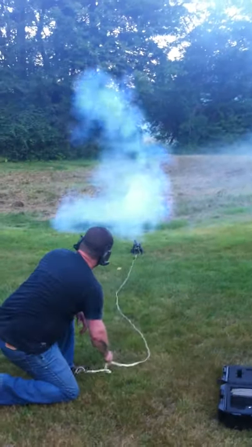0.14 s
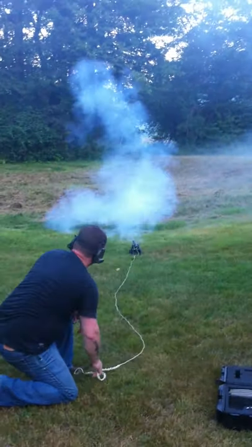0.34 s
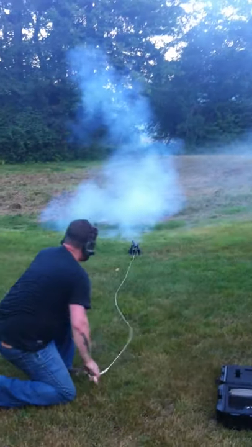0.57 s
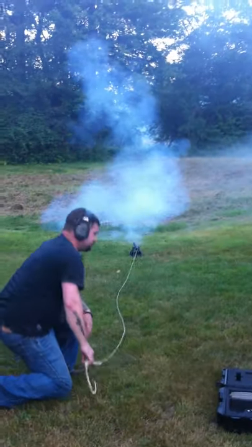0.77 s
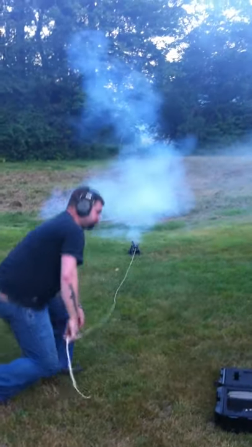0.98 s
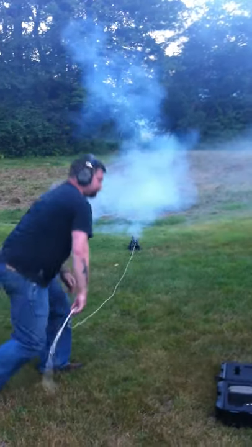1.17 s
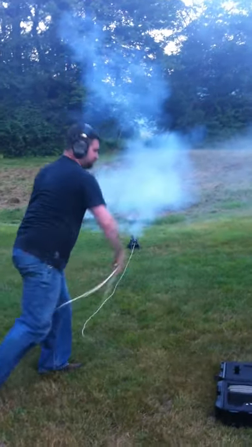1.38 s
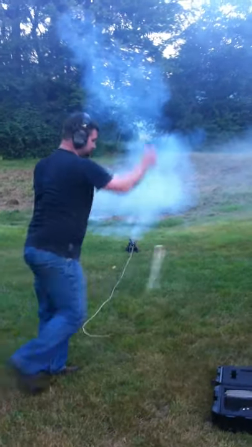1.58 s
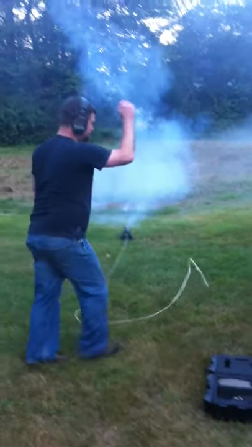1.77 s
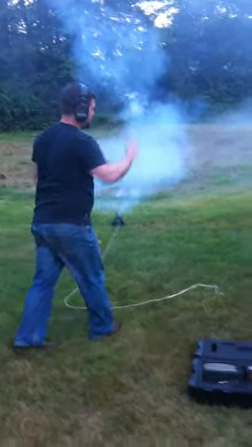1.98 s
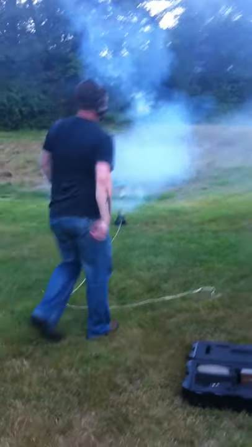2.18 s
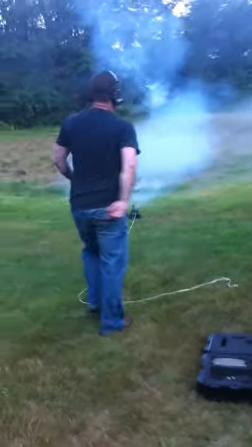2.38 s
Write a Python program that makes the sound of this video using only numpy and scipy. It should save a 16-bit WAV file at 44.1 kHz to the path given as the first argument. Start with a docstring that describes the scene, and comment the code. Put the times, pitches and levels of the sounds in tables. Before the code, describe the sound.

A small cannon's echo rolls back from distant woods and steadily fades outdoors.

```python
"""The echo of a small black powder cannon rolls over an open field; the shot itself is not heard.
The near tree line scatters the blast back bright, the far woods return a long rumble, and
absorption in air and foliage takes the treble first. A few reflections stand out as thumps and slaps.
A faint hiss comes up under the tail, with a low rumble and soft steps in the grass."""
import sys
import numpy as np
from scipy import signal
from scipy.fft import rfft, irfft, next_fast_len
from scipy.io import wavfile
from scipy.ndimage import uniform_filter1d, map_coordinates

SR = 44100
rng = np.random.default_rng(int(sys.argv[2]) if len(sys.argv) > 2 else 0)


def generate_wav(signal):
    """Clip the signal to [-1, 1] and save it as 16-bit WAV at the path in sys.argv[1]."""
    frames = np.transpose(np.atleast_2d(signal))
    scaled = np.clip(frames, -1, 1) * 32767
    pcm = np.round(scaled).astype(np.int16)
    wavfile.write(sys.argv[1], SR, pcm)


N = 107295


# Spectrum of the near echo before absorption: frequency_hz, level_db
NEAR_SPECTRUM = [(30, -11), (64, -18), (95, -7), (120, 3), (175, -1), (280, -1.5), (420, 0), (590, -4.5),
                 (760, -2), (1050, -4), (1400, -3), (2200, -3.5), (3600, -8.5), (5200, -10), (8000, -16),
                 (12000, -18), (14400, -21), (15800, -55)]
def near_trees(level_db=-32, hold_s=0.21, fade_db_per_s=24):
    """Backscatter over a short path: the tree line answers at once, holds briefly and dies away."""
    fading_s = np.maximum(np.arange(N) / SR - hold_s, 0)
    return amp(level_db - fade_db_per_s * fading_s) * scatter(NEAR_SPECTRUM)


# Spectrum of the far echo before absorption: frequency_hz, level_db
FAR_SPECTRUM = [(25, -18), (50, -19), (80, -11), (115, -14), (150, 2.5), (200, 1), (290, 1.5), (430, 2.5),
                (590, -0.5), (740, 3), (880, 3), (1030, -2.5), (1400, -2.5), (2300, -2), (3600, -8),
                (5200, -12.5), (8000, -20.5), (12000, -16.5), (16000, -42)]
# Envelope of the far echo before absorption: time_s, level_db
FAR_ENVELOPE = [(0, -36), (.25, -40.5), (.42, -37.5), (.52, -34), (.7, -33.5), (1.03, -35), (1.2, -36),
                (1.48, -37.5), (1.7, -38.5), (1.92, -40.5), (2.25, -39), (2.43, -41)]
def far_woods():
    """Reverberation: paths of many lengths spread the echo of the distant woods into a long roll."""
    return amp(curve(FAR_ENVELOPE)) * scatter(FAR_SPECTRUM)


# Absorption in air and foliage: frequency_hz, loss_db_per_s
ABSORPTION = [(60, 5), (150, 0), (400, 2), (800, 5.5), (1400, 8.5), (2500, 15.5), (4500, 26), (7500, 31.5),
              (12000, 56), (16000, 80)]
def scatter(spectrum, patch_db=0.9, flutter_db=0.2, flutter_per_s=45):
    """Diffuse scattering: countless reflections sum to noise, and later ones have lost more treble."""
    hz, travel_s, spectrogram = signal.stft(noise(spectrum), SR, nperseg=512)
    # The level varies in small random patches of frequency and time.
    patches = uniform_filter1d(rng.standard_normal(spectrogram.shape), size=5, axis=0)
    patches = unit(uniform_filter1d(patches, size=8, axis=1))
    loss_db = along(ABSORPTION, hz)[:, None] * travel_s
    echoes = signal.istft(spectrogram * amp(patch_db * patches - loss_db), nperseg=512)[1][:N]
    return echoes * amp(flutter_db * wobble(flutter_per_s))


# Single reflections of the blast: centre_s, peak_db, pitch_hz
THUMPS = [(0.035, -26.5, 128), (0.047, -49, 390), (.1, -30, 800), (0.126, -32, 123), (0.147, -28, 324),
          (0.168, -31, 134), (0.21, -36.5, 114), (.23, -29.5, 425), (0.266, -29.5, 143), (0.547, -36, 292)]
def thumps(width_cycles=0.69):
    """Coherent reflection: the pressure wave returns whole, a couple of cycles in a Gaussian envelope."""
    out = np.zeros(N)
    phases = rng.uniform(0, 2 * np.pi, len(THUMPS))
    for (centre_s, peak_db, pitch_hz), phase in zip(THUMPS, phases):
        cycles = (np.arange(N) / SR - centre_s) * pitch_hz
        envelope = np.exp(-.5 * (cycles / width_cycles) ** 2)
        out += amp(peak_db) * envelope * np.cos(2 * np.pi * cycles + phase)
    return out


# Prominent clusters of reflections: start_s, level_db, centre_hz, width_octaves, decay_s
SLAPS = [(0, -35, 4500, 0.93, 0.017), (.029, -31, 1100, 1.2, 0.013), (.07, -29, 1440, 0.12, 0.011),
         (.09, -30, 830, 0.26, 0.028), (.48, -45.5, 1800, 0.97, 0.028), (.526, -33, 356, 0.44, .04),
         (.565, -48, 174, 0.21, 0.043), (.62, -33.5, 736, 0.22, 0.011), (1.045, -32.5, 258, 1.1, 0.015),
         (1.38, -51, 780, 0.14, 0.25), (1.7, -51, 770, 0.19, 0.12)]
def slaps():
    """Incoherent summation: closely spaced reflections merge into bursts of noise."""
    return bursts(SLAPS, rise_s=0.0054)


# Contacts with the grass: start_s, level_db, centre_hz, width_octaves, decay_s
BRUSHES = [(2.046, -57, 3630, 0.049, 0.0046), (2.05, -76, 5900, 1, .015), (2.05, -76, 5400, .12, 0.27),
           (2.167, -63.5, 3250, .15, .014), (2.167, -65, 9000, 0.48, .014), (2.245, -68, 4000, 0.71, .012)]
def grass_steps():
    """Friction: steps and a cord brush the grass in faint, high bursts."""
    return bursts(BRUSHES, rise_s=0.0011)


# Spectra of the hiss, its airy top and the distant rumble: frequency_hz, level_db
HISS_SPECTRUM = [(100, -11), (170, 13), (400, -13), (1000, 11.5), (2500, 5.5), (4200, 1.5), (5400, 3),
                 (7500, -3), (10000, -4.5), (13500, -11.5), (17000, -6)]
FIZZ_SPECTRUM = [(3000, -32), (7500, -6), (10000, -3), (13500, 0.5), (17000, -3)]
RUMBLE_SPECTRUM = [(25, -30), (60, -29.5), (110, -7.5), (155, 0.5), (220, -8.5), (400, -13), (1000, -42),
                   (4000, -80)]
# Envelopes of the hiss and its airy top: time_s, level_db
HISS_ENVELOPE = [(0, -79), (.7, -73), (1.1, -67), (1.7, -67.5), (1.9, -65.5), (2.22, -65), (2.43, -64)]
FIZZ_ENVELOPE = [(0, -92), (.7, -75.5), (1.1, -73), (1.35, -75.5), (1.75, -71.5), (1.85, -67), (1.98, -68),
                 (2.22, -73.5), (2.35, -68), (2.43, -70)]
def background_noise(hiss_waver_db=0.4, fizz_waver_db=1.2, rumble_db=-54):
    """Background: a faint, wavering hiss swells as the echo fades, over a steady low rumble."""
    hiss = amp(curve(HISS_ENVELOPE) + hiss_waver_db * wobble(14.55)) * noise(HISS_SPECTRUM)
    fizz = amp(curve(FIZZ_ENVELOPE) + fizz_waver_db * wobble(14)) * noise(FIZZ_SPECTRUM)
    return hiss + fizz + amp(rumble_db) * noise(RUMBLE_SPECTRUM)


def bursts(rows, rise_s):
    """Exponential decay: each row is a band of noise that rises quickly and dies away."""
    out = np.zeros(N)
    for start_s, level_db, centre_hz, width_octaves, decay_s in rows:
        age_s = np.maximum(np.arange(N) / SR - start_s, 0)
        envelope = (1 - np.exp(-age_s / rise_s)) * np.exp(-age_s / decay_s)
        white = rng.standard_normal(N)
        band = filtered(white, lambda hz: np.exp(-.5 * (np.log2((hz + 1) / centre_hz) / width_octaves) ** 2))
        envelope_rms = np.sqrt(np.mean(envelope ** 2))
        out += amp(level_db) * envelope_rms * unit(band * envelope)
    return out


def noise(spectrum):
    """Spectral shaping: white noise coloured by a spectrum, at rms 1."""
    return unit(filtered(rng.standard_normal(N), lambda hz: amp(along(spectrum, hz))))


def filtered(x, response):
    """Linear filtering: the spectrum of x times a frequency response."""
    size = next_fast_len(N + SR // 2)
    hz = np.fft.rfftfreq(size, 1 / SR)
    return irfft(rfft(x, size) * response(hz), size)[:N]


def wobble(knots_per_s):
    """Random modulation: a smooth curve through Gaussian knots."""
    knots = rng.standard_normal(int(N * knots_per_s / SR) + 4)
    return map_coordinates(knots, [np.arange(N) * knots_per_s / SR])


def curve(rows):
    """Linear interpolation of (time_s, value) rows at every sample."""
    return np.interp(np.arange(N) / SR, *np.transpose(rows))


def along(rows, hz):
    """Interpolation of (frequency_hz, value) rows on a logarithmic frequency axis."""
    row_hz, values = np.transpose(rows)
    return np.interp(np.log(hz + 1), np.log(row_hz + 1), values)


def amp(db):
    """Decibels to amplitude ratio."""
    return 10 ** (np.asarray(db) / 20)


def unit(x):
    """Normalisation to rms 1."""
    return x / np.sqrt(np.mean(x ** 2) + 1e-20)


def scene():
    """Superposition: the echoes and the quiet field add in one channel."""
    echoes = near_trees() + far_woods() + thumps() + slaps()
    return (echoes + background_noise() + grass_steps())[None]


def record(dry):
    """Band limiting: a small microphone loses the deep bass, and a sharp cutoff ends the treble."""
    low_cut_hz, top_hz = 81, 17100
    def response(hz):
        return hz ** 2 / np.hypot(hz ** 2, low_cut_hz ** 2) * (hz < top_hz)
    return np.array([filtered(channel, response) for channel in dry])


dry = scene()
out = record(dry)
generate_wav(out)
```